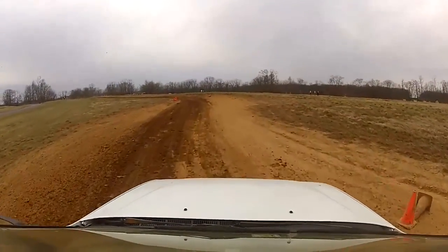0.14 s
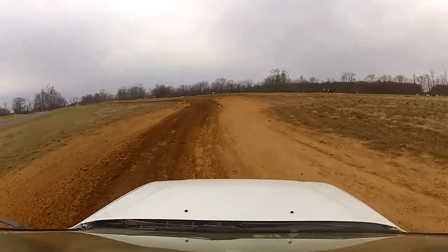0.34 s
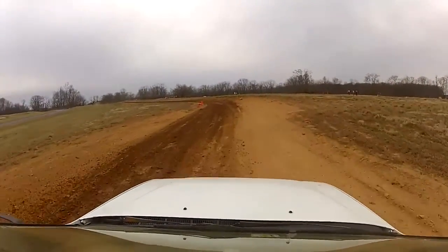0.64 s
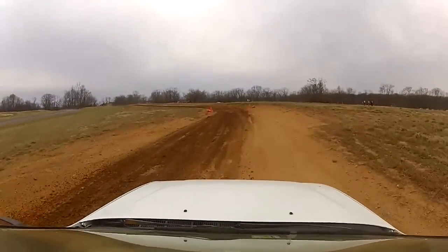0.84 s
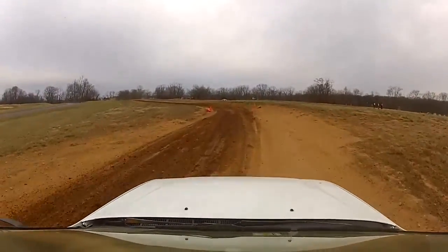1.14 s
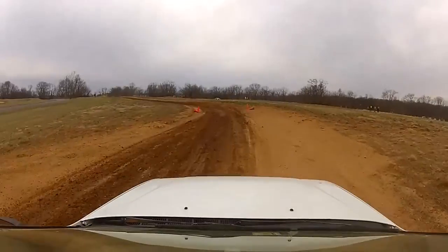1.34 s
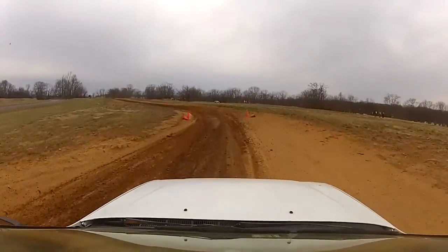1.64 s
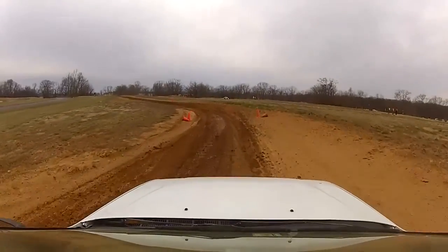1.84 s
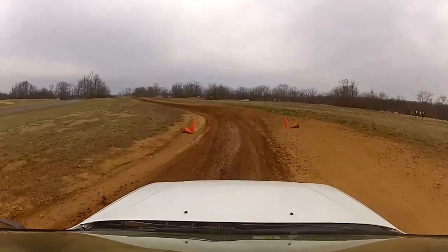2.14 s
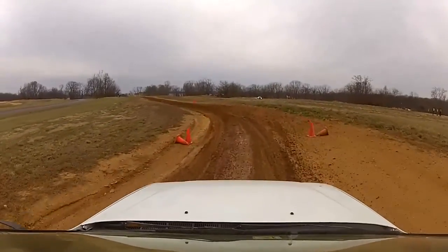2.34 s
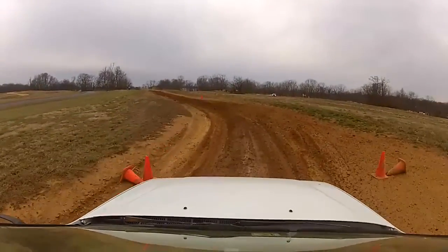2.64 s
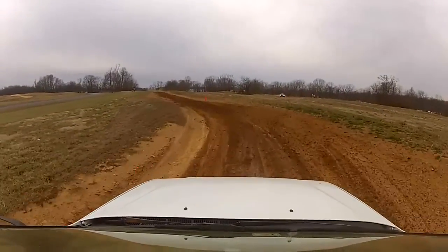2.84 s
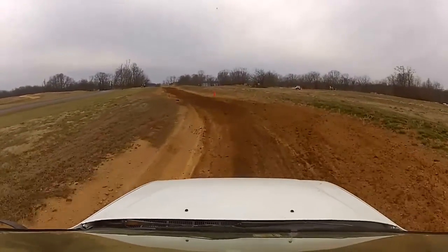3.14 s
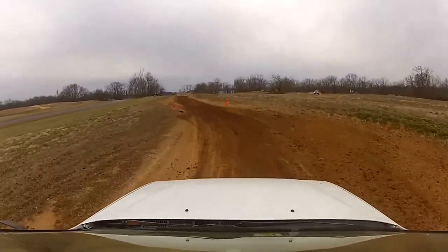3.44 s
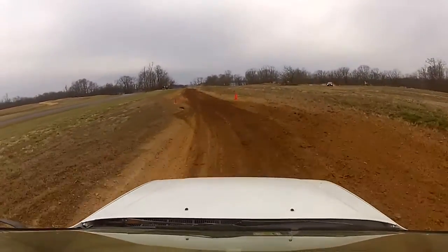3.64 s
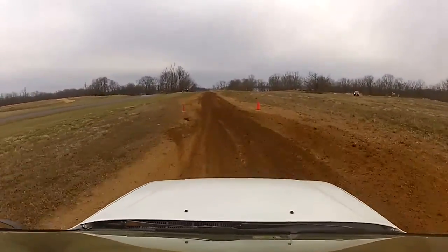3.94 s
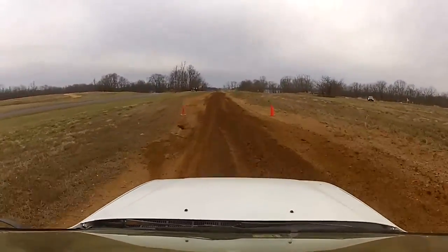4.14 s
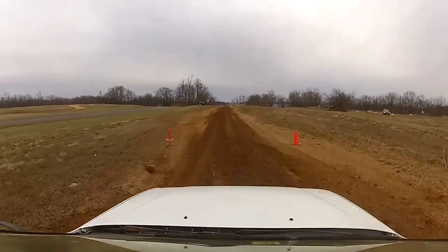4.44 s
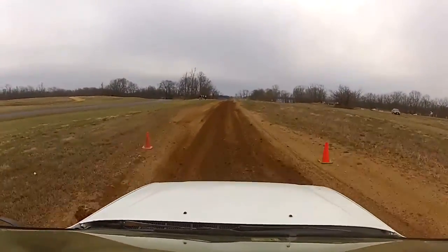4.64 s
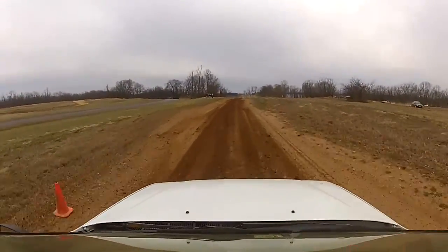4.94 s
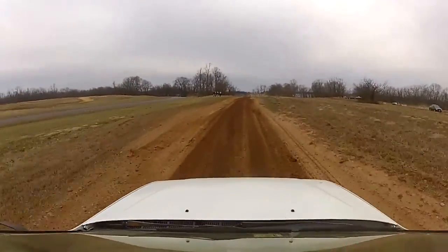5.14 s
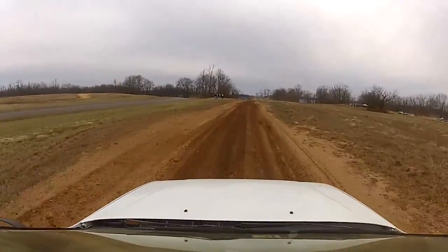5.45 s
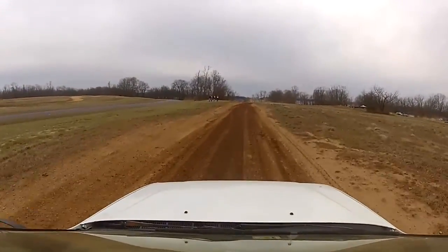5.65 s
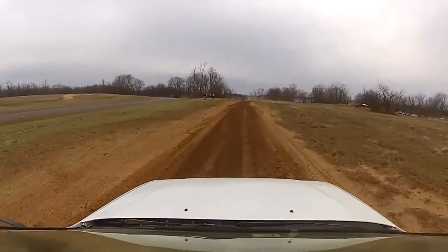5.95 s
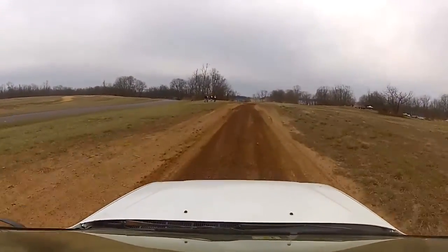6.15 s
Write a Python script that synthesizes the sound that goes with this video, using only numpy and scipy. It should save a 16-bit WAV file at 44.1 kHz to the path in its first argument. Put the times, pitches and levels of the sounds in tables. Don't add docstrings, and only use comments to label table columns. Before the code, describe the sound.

A car runs fast over loose ground, its cabin filled with bass-heavy rumble and engine hum. Hard clicks come early, then revs surge to a peak and fall, with faint rubbery squeaks. Ruts shake the mount into a run of rattles around a deep thump. Revs climb steadily afterwards and close, muffled wind hiss grows; the sound is crude, with a slightly gritty treble.

```python
import sys
import numpy as np
from scipy import signal
from scipy.fft import rfft, irfft, next_fast_len
from scipy.io import wavfile
from scipy.ndimage import uniform_filter1d

SR = 44100
rng = np.random.default_rng(int(sys.argv[2]) if len(sys.argv) > 2 else 0)


def waveform_to_disk(signal):
    frames = np.transpose(np.atleast_2d(signal))
    scaled = np.clip(frames, -1, 1) * 32767
    samples = np.round(scaled).astype(np.int16)
    wavfile.write(sys.argv[1], SR, samples)


def volts_from_db(level):
    exponent = np.asarray(level, float) / 20
    return 10 ** exponent


N = 277830

# (time [s], firing rate [Hz])
REVS = [(0, 84), (.75, 86), (1, 86.5), (1.5, 93.5), (1.75, 100), (2, 109.75), (2.25, 121), (2.4, 126.5),
        (2.5, 124), (2.8, 105), (3.1, 101), (3.9, 103), (4.25, 106), (4.6, 116), (5, 123.25), (5.5, 129.75),
        (6, 137.5), (6.3, 142)]
# (time [s], level [dB])
AIR_RUSH = [(0, -42.5), (.35, -47), (1.0, -45.5), (1.86, -42), (2.25, -39), (2.8, -37.5), (3.5, -40.5),
            (4.3, -41.5), (5.1, -37.5), (5.38, -36), (5.5, -33.5), (5.95, -31), (6.3, -29.5)]
# (middle [s], length [s], level [dB])
RUTS = [(.66, 0.43, -19.5), (1.3, 0.66, -33), (2.03, 0.72, -29), (2.72, .4, -41), (4.2, 0.72, -23),
        (4.9, 1.2, -30.5)]


def in_time(rows, **ends):
    s, *columns = np.transpose(rows)
    return [np.interp(np.arange(N) / SR, s, column, **ends) for column in columns]


def at_hz(points, hz):
    point_hz, point_db = np.transpose(points)
    return np.interp(np.log(hz + 1e-9), np.log(point_hz), point_db)


def rms_one(x):
    return x / np.sqrt(np.mean(x ** 2) + 1e-20)


def drift(rate):
    r = np.exp(-80 * np.pi * rate / SR)
    noise = rng.standard_normal(N // 40 + 2002)
    slow = signal.lfilter([1], [1, -2 * r, r * r], noise)[2000:]
    return np.interp(np.arange(N) / 40, np.arange(len(slow)), rms_one(slow))


def coloured(x, spectrum, low_hz=10, high_hz=20000):
    hz = np.arange(N // 2 + 1) * SR / N
    band = 1 / np.sqrt((1 + (low_hz / (hz + 1e-9)) ** 12) * (1 + (hz / high_hz) ** 12))
    return rms_one(irfft(rfft(x) * volts_from_db(at_hz(spectrum, hz)) * band, N))


def steadied(x, size):
    return rms_one(x / (uniform_filter1d(x ** 2, size=size) + 0.014) ** 0.63)


def ring(clicks, hz, t60):
    r, w = volts_from_db(-60 / (t60 * SR)), 2 * np.pi * hz / SR
    return signal.lfilter([0, np.sin(w)], [1, -2 * r * np.cos(w), r * r], clicks + 1e-18)


def swells(rows, rest_db):
    t, power = np.arange(N) / SR, np.zeros(N) + volts_from_db(rest_db) ** 2
    for s, length, db in rows:
        near = slice(max(0, int((s - length / 2) * SR)), int((s + length / 2) * SR))
        power[near] += volts_from_db(db) ** 2 * np.cos(np.pi * (t[near] - s) / length) ** 2
    return np.sqrt(power)


def rutted():
    hop = swells(RUTS, -57)
    return hop / hop.max()


def engine():
    # (time [s], firing line level [dB])
    effort = [(0, -38), (1.4, -25.5), (1.8, -17.5), (2.0, -7), (2.3, -8.5), (2.42, -35.5), (2.7, -14),
              (2.87, -16), (3.0, -22), (3.5, -24), (3.9, -21), (4.55, -22.5), (5.0, -16), (5.3, -16.5),
              (5.6, -17.5), (5.8, -12.5), (6.05, -17.5), (6.3, -16)]
    # (multiple of the firing rate [-], level [dB])
    orders = [(.5, -3), (1.25, -1.5), (1.5, 0), (1.75, -8), (2, -1.5), (2.25, -2), (2.5, -1), (2.75, -3),
              (3, 1.5), (3.25, -4), (3.5, -5), (4, -4)]
    # (frequency [Hz], peak level [dB])
    firewall = [(40, -34), (62, -27), (115, -28), (145, -23), (165, -40), (182, -35), (198, -22),
                (206, -23), (215, -35), (232, -50), (265, -53), (320, -53), (365, -50), (420, -54),
                (600, -62)]
    hz, = in_time(REVS)
    line_db, = in_time(effort)
    load_db = -7 + 17 * np.log2(hz / 110) - 0.08 * (line_db - line_db.mean())
    climb = uniform_filter1d(np.gradient(np.log2(hz)) * SR, size=9000)
    load_db += 5 * np.tanh(climb / 0.14)
    phase = 2 * np.pi * np.cumsum(hz * (1 + .003 * drift(8))) / SR
    off_throttle = np.clip((-19 - line_db) / 6, 0, 1)
    wander = 1.1 * off_throttle * drift(10)
    out = np.sqrt(2) * volts_from_db(line_db + 2.43 * drift(9.5)) * np.sin(phase + wander)
    for k, db in orders:
        gain = volts_from_db(db + load_db + at_hz(firewall, k * hz) + 2 * drift(5))
        out += gain * np.sin(k * phase + rng.uniform(0, 2 * np.pi))
    return out


def road():
    # (time [s], level [dB])
    roughness = [(0, -22), (.5, -18), (.78, -16.5), (1.0, -20.5), (1.6, -23.5), (1.95, -17.5), (2.35, -13),
                 (2.6, -20.5), (2.85, -13), (3.0, -20.5), (3.5, -22), (3.95, -15.5), (4.35, -15),
                 (4.6, -15.5), (4.9, -18), (5.5, -17.5), (6.3, -13.5)]
    # (time [s], level [dB])
    bumps = [(.114, -20.5), (.263, -18), (0.354, -14.5), (.669, -13), (.754, -14.5), (1.014, -15),
             (1.092, -12.5), (1.246, -18), (1.422, -14.5), (1.554, -13), (1.72, -8), (1.862, -6.5),
             (2.477, -11.5), (2.614, -9.5), (2.764, -16), (2.891, -15), (3.067, -9.5), (3.258, -7),
             (3.362, -10), (3.557, -8.5), (3.623, -10), (3.804, -10.5), (3.999, -8.5), (4.173, -8),
             (4.625, -7), (4.723, -7), (4.797, -8), (5.026, -8), (5.51, -20), (5.772, -9)]
    # (middle [s], length [s], level [dB])
    heaves = [(.95, 0.88, -24), (1.8, 1, -26.5), (2.45, 0.24, -22), (2.9, .3, -26), (3.4, 0.51, -25),
              (4.15, 1.16, -20), (5.7, 1.2, -25)]
    # (frequency [Hz], density [dB per Hz])
    cabin_modes = [(12, -30), (20, 1), (28, -2), (38, -48), (70, -31), (92, 0), (113, 0), (132, -9),
                   (152, -26), (179, -13), (201, -18.5), (219, -31.5), (234, -67), (262, -50), (420, -47),
                   (550, -78), (920, -120)]
    # (frequency [Hz], density [dB per Hz])
    body_modes = [(15, -24), (24, -10), (30, 0), (35, -10), (42, -16), (52, -8), (62, 0), (72, -3),
                  (85, -8)]
    rough_db, = in_time(roughness)
    shocks = rng.standard_normal((4, N))

    boom = steadied(coloured(shocks[0], cabin_modes, low_hz=80, high_hz=144), size=1300)
    boom_gain = swells([(s, 0.05, db) for s, db in bumps], rough_db)
    out = volts_from_db(-1.0 + 1.85 * drift(5.5)) * boom_gain * boom

    heave = steadied(coloured(shocks[1], body_modes, low_hz=36.7, high_hz=66), size=2500)
    out += swells(heaves, -35) * heave

    pan_db = -31.5 + .3 * (rough_db - rough_db.mean())
    out += volts_from_db(pan_db) * coloured(shocks[2], cabin_modes, low_hz=149.0)

    hop = steadied(coloured(shocks[3], body_modes, low_hz=25.9, high_hz=33.8), size=6000)
    return out + volts_from_db(-1.5) * swells(RUTS, -45) * hop


def drones():
    # (middle [s], length [s], level [dB], mode [Hz])
    ripples = [(0.743, 0.32, -15.5, 106), (2.504, 0.32, -25.5, 189), (4.058, 0.27, -24.5, 189),
               (4.59, 0.3, -8, 103), (5.503, 0.26, -18, 105), (5.51, 0.19, -14, 88),
               (5.763, 0.22, -16, 120)]
    t, out = np.arange(N) / SR, np.zeros(N)
    for s, length, db, hz in ripples:
        gain = np.sqrt(2) * swells([(s, length, db)], -90)
        out += gain * np.sin(2 * np.pi * hz * t + 0.99 * drift(3.7))
    return out


def levelled(x):
    envelope = np.abs(signal.hilbert(x, next_fast_len(N))[:N])
    envelope = uniform_filter1d(envelope, size=300)
    return x / (1 + (envelope / .86) ** 8) ** (1 / 8)


def thump(cabin):
    # (time [s], peak level [dB], ring [Hz], t60 [s])
    bottoming = (4.4985, .4, 112, .11)
    s, db, hz, t60 = bottoming
    blow = np.zeros(N)
    blow[round(s * SR):][:200] = -volts_from_db(db) * np.hanning(200) / 80
    t = np.arange(N) / SR - s
    rebound = .55 * np.exp(-((t - .009) / .002) ** 2)
    interrupted = cabin * (1 - .9 * np.exp(-((t - .011) / .016) ** 4))
    return interrupted + ring(blow, hz, t60) + rebound


def rattle():
    # (frequency [Hz], level [dB], t60 [s])
    shell = [
        [(1550, -12, .008), (1790, -2, .015), (2150, 0, .014), (2450, -8, .008)],
        [(3100, -5, .012), (3560, 0, .02), (3900, -14, .007)],
        [(4600, -8, .008), (5100, 0, .011), (5800, -6, .007)],
    ]
    # (time [s], peak level [dB], hardness [dB])
    mount = [(.0701, -25, -42), (.2932, -29, -33), (0.4558, -27, -2.5), (0.5137, -31, -14), (.553, -37, -2),
             (0.5817, -29.5, -5), (.6166, -39, -3), (.6448, -15.5, -10), (.684, -36, -8), (.77, -23.5, -15),
             (.8432, -28, -20), (2.0862, -23, -21), (3.78, -20.5, -26), (3.846, -22, -23),
             (3.8972, -24.5, -11), (3.9253, -26, -12), (3.981, -30, -8.5), (3.996, -24.5, -17),
             (4.027, -15, -8.5), (4.0477, -33, -9), (4.115, -20, -39), (4.1656, -15, -11.5),
             (4.1824, -22, -29), (4.2505, -19.5, -14), (4.3179, -19.5, -19), (4.3833, -33, -9),
             (4.4087, -18, -16), (4.4606, -19.5, -27), (4.528, -23, -25), (4.599, -19.5, -30)]
    # (time [s], middle modes level [dB], highest modes over them [dB])
    ticks = [(.4952, -45, -6), (0.5745, -41, -10), (.6524, -34.5, -18), (0.6714, -43, -21),
             (.7042, -44, -4), (.7405, -51, -11), (.81, -54, -8), (0.882, -54, -14), (.9057, -44.5, -20),
             (1.191, -45.5, -9), (2.021, -41, -12), (3.7434, -39.5, -18), (3.8148, -38.5, -19),
             (3.912, -38, -4), (4.058, -50, 6), (4.082, -41, -14), (4.152, -48, -8), (4.294, -42, -9),
             (4.4792, -46, -6), (4.4986, -40, -10), (4.5087, -49, 8), (4.5435, -50, 5), (4.6124, -41, -6),
             (4.845, -38, -14)]
    knock_s = np.array(mount + ticks)[:, :1]
    _, tick_db, thin_db = np.transpose(ticks)
    t = np.arange(1200) / SR
    chatter = rng.standard_normal((len(knock_s), len(t)))
    chatter = chatter * np.exp(-t / .0015) * (1 - np.exp(-t / .0003))
    luck_db = 1.2 * rng.standard_normal((len(knock_s), 10))
    at = (knock_s * SR).astype(int) + np.arange(len(t))

    s, db, hard_db = np.transpose(mount)
    top_db = db + hard_db - 11 + 3 * rng.standard_normal(len(s))
    mount_db = [db, db + hard_db, top_db]
    group_db = np.hstack([mount_db, [tick_db + 8.5, tick_db, tick_db + thin_db]])

    patter_db = in_time(AIR_RUSH)[0] + 9.5 * rutted() + 6 * swells([(2.4, 1.5, 0)], -44)
    tap_db = patter_db + 2.4 * np.minimum(rng.exponential(1, N), 2.5)
    taps = volts_from_db(tap_db) * (rng.random(N) < 50 / SR)

    out, mode = np.zeros(N), 0
    for group, (modes, faint_db, crest_db) in enumerate(zip(shell, [-1.5, -9, -18], [-1.5, 7, 7])):
        edges = [.88 * modes[0][0], 1.03 * modes[-1][0]]
        band = signal.butter(3, edges, "band", fs=SR, output="sos")
        faint = volts_from_db(faint_db) * taps
        rings, patter = 0, 0
        for hz, db, t60 in modes:
            rings = rings + ring(chatter * volts_from_db(db + luck_db[:, [mode]]), hz, t60)
            patter = patter + ring(volts_from_db(db) * faint * rng.standard_normal(N), hz, t60)
            mode += 1
        rings = signal.sosfilt(band, rings)
        out += signal.sosfilt(band, patter)
        peak = volts_from_db(group_db[group] + crest_db) / np.abs(rings).max(axis=1)
        np.add.at(out, at, rings * peak[:, None])
    return out


def squeaks():
    # (middle [s], length [s], peak level [dB], top pitch [Hz], moment of top as share of length [-])
    slips = [
        (0.068, 0.054, -41.5, 490, .5),
        (0.484, 0.12, -45.5, 606, 0.193),
        (2.175, .32, -42, 556, .55),
        (2.673, 0.077, -40, 734, 0.28),
        (2.733, 0.0613, -33, 646, 0.14),
    ]
    sags = [8, 42, 11, 8.9, 84]
    out, t = np.zeros(N), np.arange(N) / SR
    for (s, length, db, top_hz, share), sag in zip(slips, sags):
        top_s = s + (share - .5) * length
        hz = top_hz * 2 ** -np.minimum(sag * (t - top_s) ** 2, 1)
        gain = swells([(s, length, db / 2)], -93) ** 2 * volts_from_db(1.5 * drift(26))
        phase = 2 * np.pi * np.cumsum(hz * (1 + 0.012 * drift(40))) / SR
        out += np.sqrt(2) * gain * np.sin(phase)
    return out


def air():
    # (frequency [Hz], density [dB per Hz])
    housing = [(530, -79), (900, -4.5), (1070, 3), (1230, 7.5), (1810, 9.5), (2000, 6), (2430, 5.5),
               (2770, -3.5), (3030, 0.5), (3270, -4), (3540, 5), (4280, -21), (5170, -4), (5750, -22),
               (6400, -13.5), (8320, -14), (14100, -120)]
    # (frequency [Hz], density [dB per Hz])
    trim = [(140, 1.5), (240, 11.5), (280, -4.5), (343, -0.5), (448, -3), (563, -2.5), (625, 6), (699, 4),
            (830, -5.5), (1050, -4), (1360, 4), (2310, -120)]
    hiss_db, = in_time(AIR_RUSH)
    revs_hz, = in_time(REVS)
    bright_db = 6 + 0.1 * (hiss_db + 41.5) - 9 * np.exp(-np.arange(N) / SR / 1.3)
    buzz_db = -43.5 + 0.2 * (hiss_db + 44) + 11.5 * np.log2(revs_hz / 110) + 6.5 * rutted()
    grit = volts_from_db(1.0 * np.minimum(rng.exponential(1, N), 5)) * (rng.random(N) < 1500 / SR)
    gusts = 1 + 0.05 * signal.lfilter([1], [1, -.98], grit) / 4
    excite = rng.standard_normal(N) * gusts
    excite *= volts_from_db(0.76 * drift(3.4) + 1.1 * drift(71))
    low = coloured(excite, housing, high_hz=2600)
    high = coloured(excite, housing, low_hz=2890)
    hiss = volts_from_db(hiss_db) * (low + volts_from_db(bright_db - 13.5) * high)
    return hiss + volts_from_db(buzz_db + 2.1 * drift(23)) * coloured(rng.standard_normal(N), trim)


def scene():
    cabin = thump(levelled(engine() + road() + drones()))
    return (cabin + air() + rattle() + squeaks())[None]


def clock_slip(x):
    # (rate [Hz], depth of one sample [dB])
    slip = [(12000, 4.2), (8100, -8), (3900, -11.5), (4200, -17), (7800, -17), (15600, -14), (11700, -21)]
    slope = np.gradient(x, axis=1)
    t = np.arange(N) / SR
    first, *rest = [volts_from_db(db) * np.cos(2 * np.pi * hz * t + k) for k, (hz, db) in enumerate(slip)]
    unsteady = volts_from_db(-15) * np.diff(rng.standard_normal(N + 2), 2)
    steep = signal.ellip(8, .5, 40, 15250, fs=SR, output="sos")
    early = signal.sosfilt(steep, slope * (first + unsteady))
    return x + signal.lfilter([.5, .5], [1], early + slope * sum(rest))


def roll_off(x):
    return signal.sosfilt(signal.butter(12, 15800, fs=SR, output="sos"), x)


def record(dry):
    clipped = np.clip(dry, -.995, .995)
    return roll_off(clock_slip(clipped))


dry = scene()
out = record(dry)
waveform_to_disk(out)
```